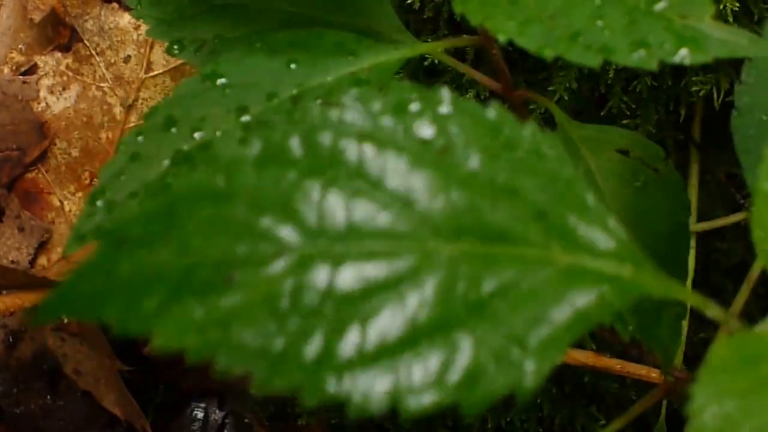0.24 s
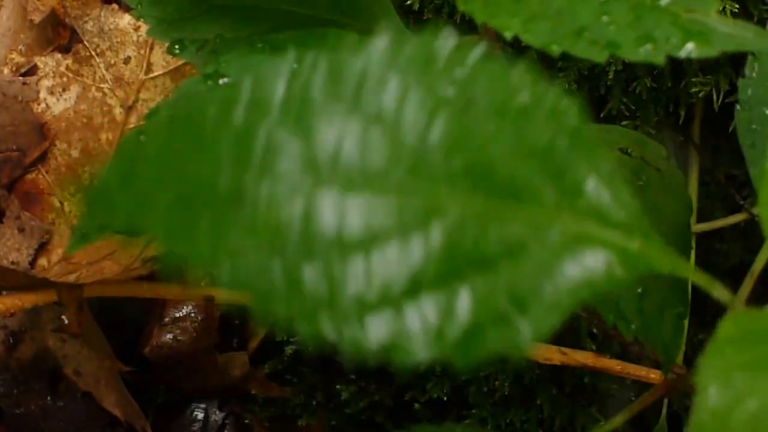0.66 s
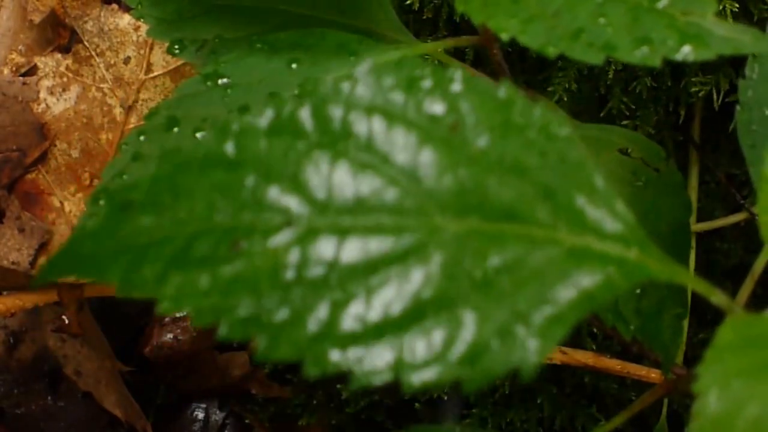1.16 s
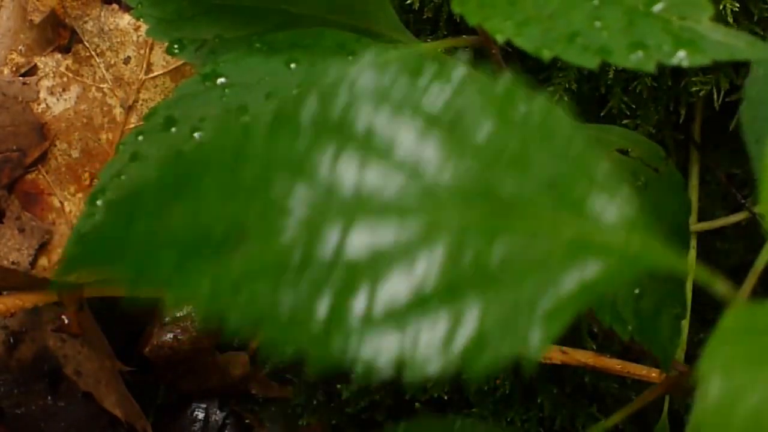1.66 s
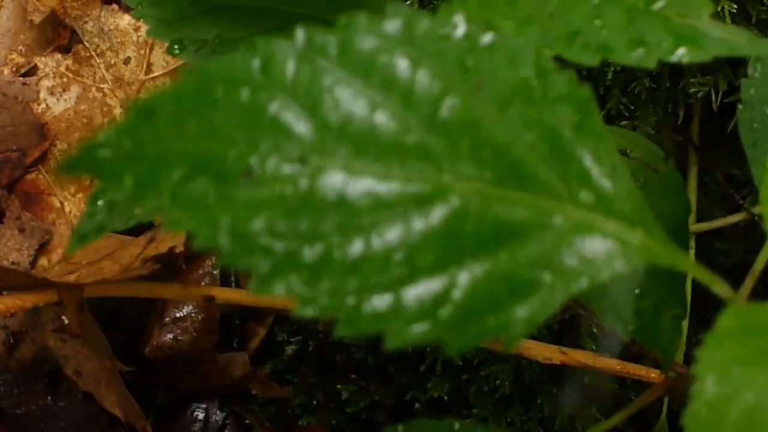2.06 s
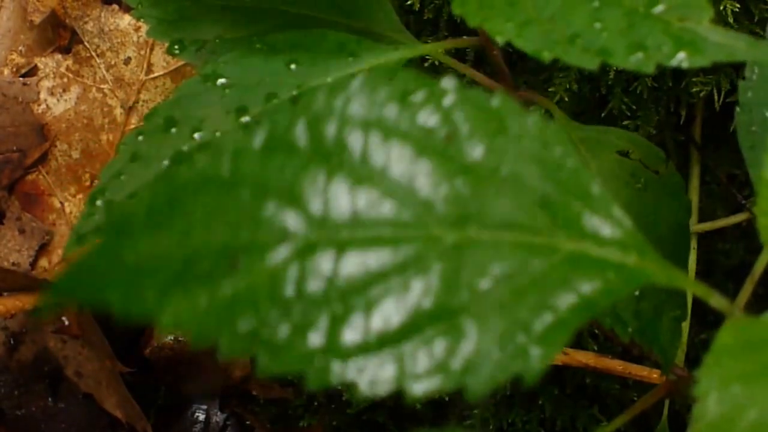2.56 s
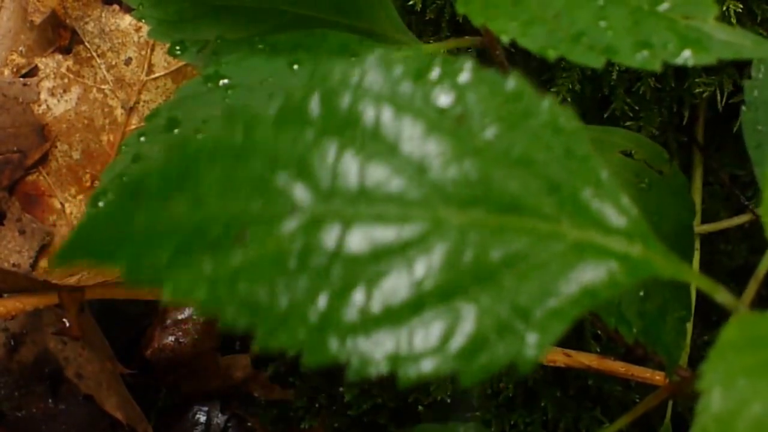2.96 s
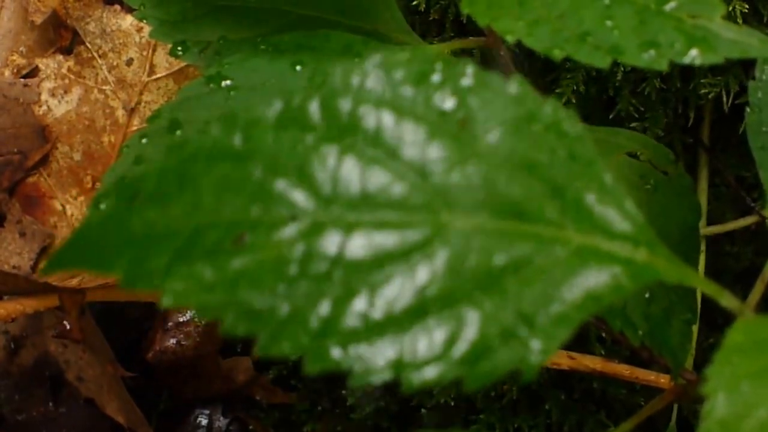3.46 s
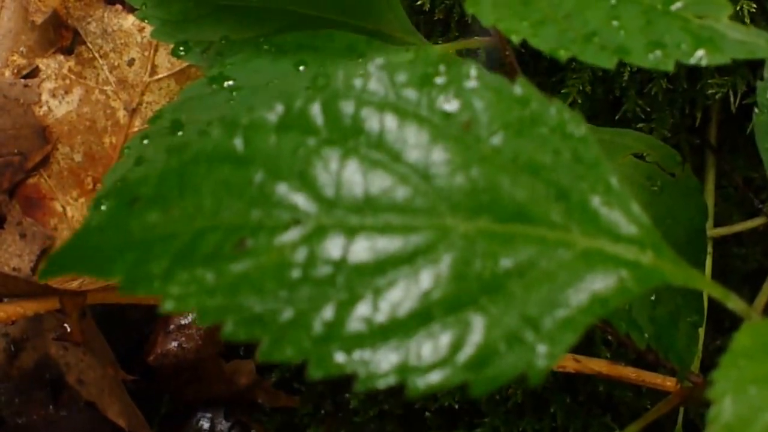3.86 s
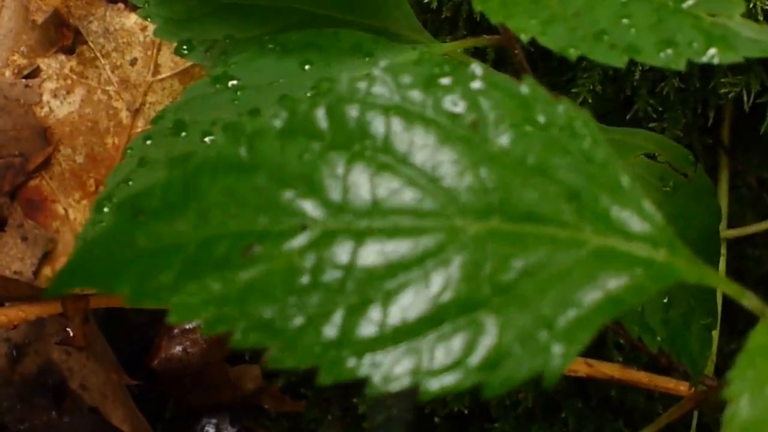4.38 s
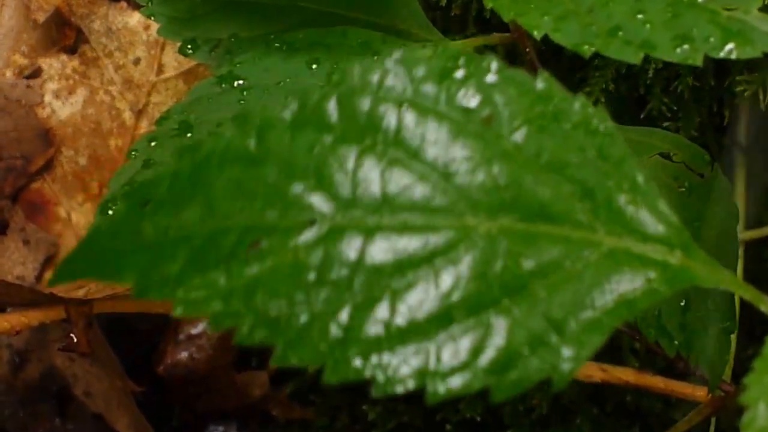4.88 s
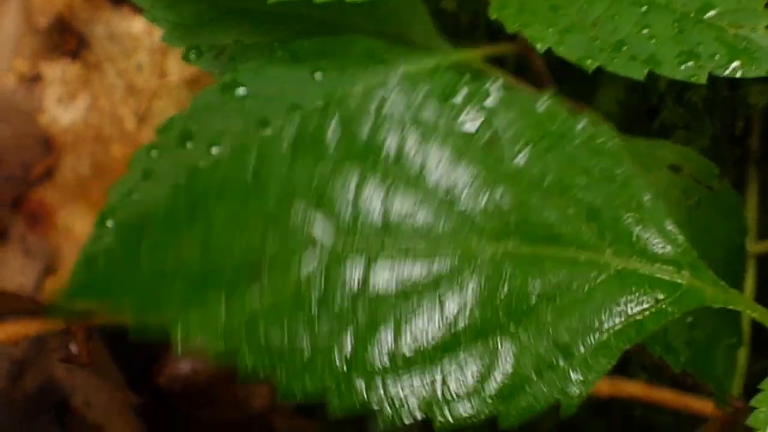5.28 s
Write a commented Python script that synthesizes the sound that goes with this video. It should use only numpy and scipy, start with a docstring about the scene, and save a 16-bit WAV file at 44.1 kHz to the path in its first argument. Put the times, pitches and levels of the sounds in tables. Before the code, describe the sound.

Light rain falls in a wood, heard close above low leaves for about five and a half seconds. A quiet, even hiss of distant rain stays constant, beneath fine irregular patter, bright tiny ticks and a faint bubbling trickle. From 0.1 to 0.3 seconds a rapid cluster of crisp drops slaps nearby wet leaves. At 0.7 another sharp tap brings bright plinks and a short low bloop. A strong group hits at about 1.27, with a wet pop, followed by smaller taps and a rising bloop near 1.5. Softer drops and a hollow bloop come around 2.1; a clear plink and upward gulp follow at 2.6 to 2.7. A fuller slap with a pronounced rising bloop lands at 3.1. Sparse light taps and pings continue, with tiny very high ticks at 4.3, then a bright, hard tap and bloop at 5.0 and scattered drips to the end. The space is open, with short, faint scattering.

```python
"""Light rain in a wood, heard from just above the undergrowth.
From the start: even hiss of rain on the trees (shaped noise), fine patter, a faint trickle, thin tones,
bright spray and light taps at random. From 0.1 s heavy drops tap the nearest leaves (band-passed slap and
splash); from 0.2 s small bubbles ping (decaying sines); from 0.7 s big drips fall into a puddle, where
air pockets bloop upward (gliding sines). Scatter off leaves and trunks colours all but the hiss."""
import sys
import numpy as np
from scipy import signal
from scipy.fft import rfft, irfft
from scipy.io import wavfile
from scipy.ndimage import uniform_filter1d

SR = 44100
rng = np.random.default_rng(int(sys.argv[2]) if len(sys.argv) > 2 else 0)


def wav_out(sig):
    """Save sig, one row per channel (or a flat mono array), as 16-bit PCM at SR to the path in sys.argv[1]."""
    wavfile.write(sys.argv[1], SR, np.round(np.clip(np.atleast_2d(sig).T, -1, 1) * 32767).astype(np.int16))


N = 243873

# Relative spectrum of distant rain on the trees: frequency_hz, level_db
RAIN_SPECTRUM = [(20, -23), (55, -24), (100, -12.5), (165, -7.5), (300, -4), (800, -1), (1160, 1),
                 (1650, -4), (3200, -4), (4000, -5), (7000, -7), (10000, -8), (13000, -13), (16000, -11)]
# Relative level of patter drops by leaf pitch: frequency_hz, level_db
PATTER_SPECTRUM = [(700, -3), (1300, -0.5), (3000, 4), (5000, 1), (9000, 2.5), (15000, 3.5)]
# Relative level of bubbles trickling in wet ground: frequency_hz, level_db
TRICKLE_SPECTRUM = [(1000, 1.5), (1180, 4), (1600, -0.5), (2500, 2), (3400, 0.5)]
# Heaviest drops on the nearest leaves: start_s, level_db, centre_hz, width_octaves
LEAF_DROPS = [ (0.094, -32.5, 2800, 2.9), (.12, -24.5, 4020, 0.74), (0.131, -29.5, 3700, 3.24),
              (0.1387, -18.5, 3180, 1.3), (0.1642, -29.5, 3000, 3), (0.1774, -29, 3700, 1.1),
              (0.2048, -24, 4300, 2), (.2173, -31.5, 6000, 1.6), (0.2222, -32, 6000, 1.4),
              (.279, -37, 3100, 0.3), (.379, -33.5, 9000, 2), (.68, -25, 4860, 0.96),
              (0.7025, -18.5, 5340, 1.34), (.757, -27, 8600, 0.5), (1.1468, -29.5, 5140, 0.62),
              (1.268, -23, 3380, 0.88), (1.2702, -18.5, 3850, 0.45), (1.2731, -16, 5800, 2),
              (1.4577, -23.5, 2080, 3.24), (1.478, -30, 4200, 1.8), (1.507, -25.5, 5670, 1.7),
              (1.5629, -24.5, 3730, 2.78), (1.9933, -34, 6530, 1), (2.063, -33, 2570, 3.1),
              (2.1092, -32, 9400, 0.52), (2.141, -23, 4000, 3), (2.161, -33.5, 4230, .5),
              (2.3885, -35, 4330, 1.9), (2.3986, -28.5, 4366, 0.61), (2.5012, -32.5, 1870, 4.8),
              (2.712, -28, 4600, 2.7), (2.794, -25.5, 6300, 0.38), (2.811, -32, 4370, 0.36),
              (2.886, -32, 13500, 1.1), (3.1072, -19.5, 2500, 1.5), (3.113, -23, 2250, 0.28),
              (3.1207, -27.5, 4500, 2.4), (3.5602, -36, 10500, 1.4), (3.6742, -27.5, 6870, 3),
              (3.7947, -34.5, 4200, 0.3), (3.892, -34.5, 5300, 2.6), (3.9798, -26, 4250, 0.6),
              (4.076, -31, 9400, 3.4), (4.2059, -28, 2572, 3.16), (4.223, -27, 6000, 1.23),
              (4.511, -30.5, 8494, .6), (4.9114, -28.5, 2346, 3.1), (4.9632, -32, 9200, 0.33),
              (4.9832, -16.5, 8850, 1.03), (5.0524, -34, 9000, 0.65), (5.0805, -24, 3320, 0.59),
              (5.109, -30.5, 2800, 1.3), (5.197, -30, 7900, 2.88), (5.462, -37, 3530, 0.26),
              (5.517, -31.5, 4470, 0.45)]
# Small bubbles: start_s, pitch_hz, peak_db
SMALL_BUBBLES = [ (0.1663, 1225, -34.5), (.323, 1276, -33), (.477, 1980, -30.5), (0.559, 2600, -35.5),
                 (.704, 4430, -17), (.706, 3870, -21), (1.036, 1760, -34), (1.1469, 4010, -23.5),
                 (1.151, 3250, -30.5), (1.176, 2960, -33.5), (1.255, 2490, -30), (1.27, 3130, -19.5),
                 (1.5632, 3850, -25.5), (2.172, 2320, -31), (2.302, 1240, -35.5), (2.4464, 1880, -28.5),
                 (2.5904, 8660, -22.5), (2.7112, 3190, -15.5), (3.066, 1114, -34.5), (3.233, 894, -35.5),
                 (3.468, 3090, -35), (3.569, 4900, -29), (4.016, 2400, -38), (4.2303, 4000, -23.5),
                 (4.3037, 14300, -22), (4.3083, 10560, -21.5), (4.852, 1690, -35.5), (4.89, 2320, -34),
                 (5.074, 2520, -31), (5.17, 2320, -35), (5.2184, 5260, -21.5)]
# Air pockets opened by big drips (pitches before overshoot and wobble):
# start_s, life_s, low_hz, end_hz, open_db, close_db, pop_db
AIR_POCKETS = [ (0.7422, 0.0293, 489, 907, -16.5, -59, -22.5), (.773, 0.025, 714, 1670, -36, -24, -55),
               (1.2729, .023, 1004, 1320, -21, -42, -22), (1.477, 0.0079, 1300, 1434, -35, -31, -32),
               (1.5335, 0.046, 1020, 2260, -29.5, -40, -28), (2.1387, .043, 600, 860, -22.5, -36, -22.5),
               (2.188, .074, 469.6, 1610, -37, -31.5, -48), (2.6331, .074, 772, 2000, -31.5, -42.5, -29),
               (3.1196, 0.086, 589, 2520, -18.5, -35, -18), (3.694, 0.025, 627, 720, -41, -61, -33),
               (4.9912, 0.055, 634, 1430, -21, -34, -19.5)]

CUTOFF_HZ = 16000
TIME_S = np.arange(N) / SR
DROP_S = TIME_S[:SR // 8]   # time within one drop

# Splash decay at the reference level; harder hits are crisper
SPLASH_DECAY_S, SPLASH_REF_DB, SPLASH_HALVING_DB = 0.0038, -27.5, 28
# Ring decay in cycles at the reference level; harder-struck bubbles burst sooner
PING_CYCLES, PING_REF_DB, PING_HALVING_DB = 9.2, -25, 31
# Glide exponent: the longer a pocket lives, the later and steeper its glide
BEND_PER_S, BEND_BASE = 30, 0.623
# A deep pocket holds its opening tone longer
HOLD_S, HOLD_REF_HZ, HOLD_POWER = 0.0086, 611, 2.6
WAIST_DB = -2   # mid-life level, re closing level


def from_db(db):
    """Convert decibels to amplitude gain."""
    return 10 ** (np.asarray(db) / 20)


def rms_one(x):
    """Scale to unit rms."""
    return x / np.sqrt(np.mean(x ** 2) + 1e-20)


def at_hz(points, hz):
    """Read a spectrum table in dB on a log-frequency axis."""
    known_hz, db = np.transpose(points)
    return np.interp(np.log(np.maximum(hz, 1)), np.log(known_hz), db)


def band(x, centre_hz, octaves, order=1):
    """Band-pass around a centre, as a broad resonance would."""
    low_hz = centre_hz * 2 ** (-octaves / 2)
    high_hz = min(centre_hz * 2 ** (octaves / 2), .47 * SR)
    sos = signal.butter(order, [low_hz, high_hz], "band", fs=SR, output="sos")
    return signal.sosfilt(sos, x + 1e-18)


def highpass(x, cutoff_hz):
    """Fourth-order bass cut."""
    sos = signal.butter(4, cutoff_hz, "high", fs=SR, output="sos")
    return signal.sosfilt(sos, x + 1e-18)


def sine(pitch_hz):
    """Sine that follows a pitch curve by summing its phase."""
    return np.sin(2 * np.pi * np.cumsum(pitch_hz) / SR)


def add(out, start_s, sound):
    """Mix a sound in at a time, cut at the end."""
    start = max(int(start_s * SR), 0)
    out[start:start + len(sound)] += sound[:max(N - start, 0)]


def far_rain(level_db=-48.0):
    """Countless distant drops merge into a steady hiss: noise shaped by a spectrum."""
    gain = from_db(at_hz(RAIN_SPECTRUM, np.arange(N // 2 + 1) * SR / N))
    noise_spectrum = rfft(rng.standard_normal(N))
    hiss = rms_one(irfft(noise_spectrum * gain, N))
    return hiss * from_db(level_db)


def tap(centre_hz, octaves, decay_s, spray=0.34, wet_s=0.0045, build_s=0.0003,
        crack_db=-24, crack_octaves=1.7):
    """A drop slaps a limp leaf, its splash hisses through the same resonance; some of the crack is broad."""
    envelope = np.exp(-DROP_S / decay_s) * (1 - np.exp(-DROP_S / build_s))
    splash = rng.standard_normal(len(DROP_S)) * envelope
    force = spray * decay_s / wet_s * splash   # wetter leaf: longer splash, outweighing the slap
    force[0] += 2   # slap
    body = band(force, centre_hz, octaves, order=2)
    crack = band(force, centre_hz, octaves + crack_octaves, order=2)
    sound = body + from_db(crack_db) * crack
    peak_rms = np.sqrt(uniform_filter1d(sound ** 2, SR // 1000).max())   # 1 ms window
    return sound / peak_rms


def patter(count=520, level_db=-43, spread_db=13, octaves=0.88, decay_s=0.0035,
           rebound_db=-4, rebound_max_s=.035):
    """Drops on leaves farther off: each leaf has its own colour; a droplet bounces off to land nearby."""
    out = np.zeros(N)
    for when, distance, colour, splash, limpness, flight, size in rng.random((count, 7)):
        start_s = when * N / SR
        leaf_hz = np.interp(colour, [0, .2, .6, 1], [1200, 3200, 7500, 14500])
        drop_db = level_db + at_hz(PATTER_SPECTRUM, leaf_hz) + spread_db * (.5 - np.sqrt(distance))
        width_octaves = octaves * (0.32 + 2 * limpness ** 2)
        first = tap(leaf_hz, width_octaves, decay_s * (.5 + splash))
        add(out, start_s, from_db(drop_db) * first)
        rebound = tap(leaf_hz * 2 ** (size - .5), width_octaves, decay_s)
        add(out, start_s + rebound_max_s * flight, from_db(drop_db + rebound_db) * rebound)
    return out


def ping(pitch_hz, decay_s, rise=0.019, attack_cycles=0.75):
    """A bubble rings and sharpens a little as it nears the surface."""
    rising_hz = pitch_hz * (1 + rise * np.minimum(DROP_S / decay_s, 3))
    swell = (1 - np.exp(-DROP_S * pitch_hz / attack_cycles)) * np.exp(-DROP_S / decay_s)
    return swell / swell.max() * sine(rising_hz)


def trickle(count=600, level_db=-50, spread_db=7, decay_cycles=12):
    """Faint bubbles ring in the water that runs over the ground."""
    out = np.zeros(N)
    for when, distance, size in rng.random((count, 3)):
        pitch_hz = 1000 * 3.6 ** size
        bubble_db = level_db + at_hz(TRICKLE_SPECTRUM, pitch_hz) + spread_db * (.5 - np.sqrt(distance))
        add(out, when * N / SR, from_db(bubble_db) * ping(pitch_hz, decay_cycles / pitch_hz))
    return out


def fine_spray(count=75, level_db=-40.0, spread_db=7, lowest_hz=7000, octaves=0.71, decay_s=0.0041):
    """Tiny droplets tick brightly on the closest leaves."""
    out = np.zeros(N)
    for when, strength, size in rng.random((count, 3)):
        gain = from_db(level_db + spread_db * (strength - .5))
        add(out, when * N / SR, gain * tap(lowest_hz * 2 ** size, octaves, decay_s))
    return out


def light_taps(count=16, level_db=-38, spread_db=4, lowest_hz=3000, range_octaves=1.7,
               octaves=1.0, decay_s=0.0045):
    """Lighter drops land at random on the same near leaves."""
    out = np.zeros(N)
    for when, strength, size, limpness in rng.random((count, 4)):
        centre_hz = lowest_hz * 2 ** (range_octaves * size)
        sound = tap(centre_hz, octaves * (.5 + limpness), decay_s)
        add(out, when * N / SR, from_db(level_db + spread_db * (strength - .5)) * sound)
    return out


def thin_tones(count=10, level_db=-51.0, lowest_hz=2300, range_octaves=0.46, decay_s=0.053):
    """Now and then a thin, faint tone lingers: a slow-starting, decaying sine."""
    out = np.zeros(N)
    fade = 1 - (DROP_S / DROP_S[-1]) ** 2
    for when, size in rng.random((count, 2)):
        pitch_hz = lowest_hz * 2 ** (range_octaves * size)
        tone = ping(pitch_hz, decay_s, rise=0.0033, attack_cycles=30)
        add(out, when * N / SR, from_db(level_db) * fade * tone)
    return out


def leaf_taps(flex_db=-8, flex_hz=640, flex_octaves=0.93, flex_decay_s=0.0041, square_octaves=3):
    """Drops on the nearest leaves; a square hit, broad in sound, also flexes the whole blade."""
    out = np.zeros(N)
    for start_s, level_db, centre_hz, octaves in LEAF_DROPS:
        decay_s = SPLASH_DECAY_S * 2 ** ((SPLASH_REF_DB - level_db) / SPLASH_HALVING_DB)
        add(out, start_s, from_db(level_db) * tap(centre_hz, octaves, decay_s))
        if octaves > square_octaves:
            flex = tap(flex_hz, flex_octaves, flex_decay_s)
            add(out, start_s, from_db(level_db + flex_db) * flex)
    return out


def puddle_pings(splash_db=-9, splash_ratio=1.194, splash_octaves=0.68, splash_decay_s=0.0027):
    """Small bubbles trapped by the nearest drops ring, each born in a little splash."""
    out = np.zeros(N)
    for start_s, pitch_hz, peak_db in SMALL_BUBBLES:
        decay_s = PING_CYCLES / pitch_hz * 2 ** ((PING_REF_DB - peak_db) / PING_HALVING_DB)
        splash = tap(min(pitch_hz * splash_ratio, .33 * SR), splash_octaves, splash_decay_s)
        sound = ping(pitch_hz, decay_s) + from_db(splash_db) * splash
        add(out, start_s, from_db(peak_db) * sound)
    return out


def waver(step_s):
    """Smooth chance within one drop: unit-spread random points joined by lines."""
    return np.interp(DROP_S / step_s, np.arange(128), rng.standard_normal(128))


def puddle_bloops(overshoot=0.4, settle_s=0.0015, ring_s=0.0055, pop_hz=1250, pop_octaves=1.13,
                  pop_decay_s=0.0035, fade_db=22, wobble_db=3, wobble_pitch=0.1, wobble_s=.0025,
                  lowest_hz=340):
    """An air pocket pops open and rings; it shrinks, so pitch climbs, and swells again before closing."""
    out = np.zeros(N)
    stages = np.array([.42, .6, .82, .96, 1.06, 1.4])   # shares of life
    for start_s, life_s, low_hz, end_hz, open_db, close_db, pop_db in AIR_POCKETS:
        age = DROP_S / life_s
        unrest = np.clip(age, .3, 1)   # walls wobble more as the pocket collapses

        bend = BEND_BASE + BEND_PER_S * life_s
        glide_hz = low_hz * (end_hz / low_hz) ** (np.minimum(age, 1.05) ** bend)
        settling = overshoot * np.exp(-DROP_S / settle_s)
        pitch_hz = glide_hz * (1 + settling + wobble_pitch * unrest * waver(wobble_s))

        hold_s = HOLD_S * (HOLD_REF_HZ / low_hz) ** HOLD_POWER
        opening = from_db(open_db) * np.exp(-np.maximum(DROP_S - hold_s, 0) / ring_s)
        middle_db = close_db + WAIST_DB
        stage_db = [middle_db, (middle_db + close_db) / 2 + 0.5, close_db,
                    close_db + 3, close_db - fade_db, -100]
        closing = from_db(np.interp(age, stages, stage_db)) * np.minimum(age / stages[0], 1)
        level = (opening + closing) * from_db(wobble_db * unrest * waver(wobble_s))

        pop = from_db(pop_db) * tap(pop_hz, pop_octaves, pop_decay_s)
        add(out, start_s, level * sine(pitch_hz) + pop)
    return highpass(out, lowest_hz)   # so small a source radiates no bass


def undergrowth(x, near_db, far_db, near_decay_s=0.0058, far_decay_s=0.037, build_s=0.0045,
                centre_hz=3500, octaves=4):
    """Leaves and ground scatter each sound at once; the trunks return a faint longer tail."""
    t = TIME_S[:SR // 2]
    near, far = rng.standard_normal((2, len(t))) * (1 - np.exp(-t / build_s))
    near = near * np.exp(-t / near_decay_s)
    far = far * np.exp(-t / far_decay_s)
    echo = from_db(near_db) * near / np.linalg.norm(near) + from_db(far_db) * far / np.linalg.norm(far)
    return x + band(signal.fftconvolve(x, echo)[:N], centre_hz, octaves)


def scene():
    """Near drops sound dry; patter, trickle and thin tones are more scattered; distant rain lies under all."""
    around = undergrowth(patter() + trickle() + thin_tones(), near_db=-6, far_db=-19.5)
    leaves = fine_spray() + light_taps() + leaf_taps()
    puddle = puddle_pings() + puddle_bloops()
    near = undergrowth(leaves + puddle, near_db=-12, far_db=-21.5)
    return (far_rain() + around + near)[None]


def record(dry, notch_hz=7500, notch_q=17):
    """A narrow notch dips the treble, then a steep low-pass cuts the top."""
    notch_b, notch_a = signal.iirnotch(notch_hz, notch_q, fs=SR)
    dipped = signal.lfilter(notch_b, notch_a, dry)
    top_cut = signal.ellip(10, .2, 80, CUTOFF_HZ, fs=SR, output="sos")   # ripple, stop-band in dB
    return signal.sosfilt(top_cut, dipped)


dry = scene()
out = record(dry)
wav_out(out)
```